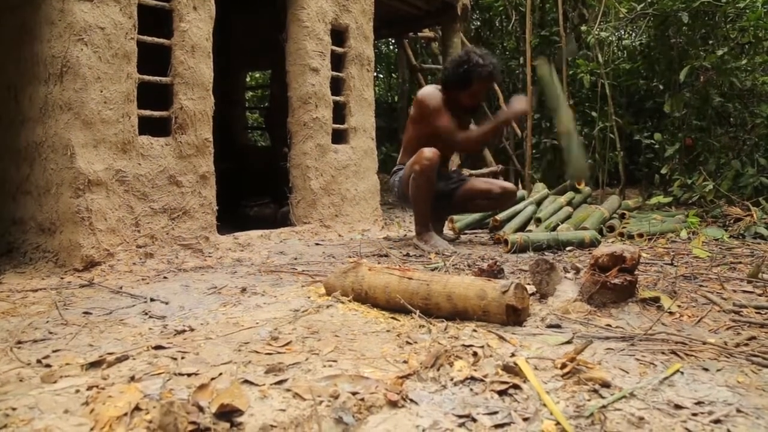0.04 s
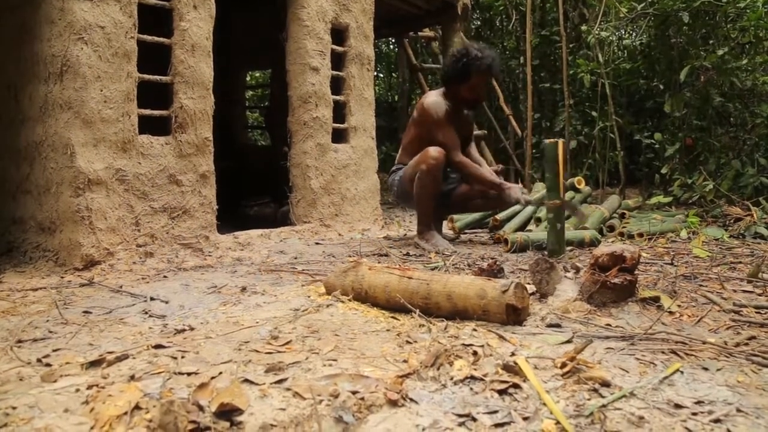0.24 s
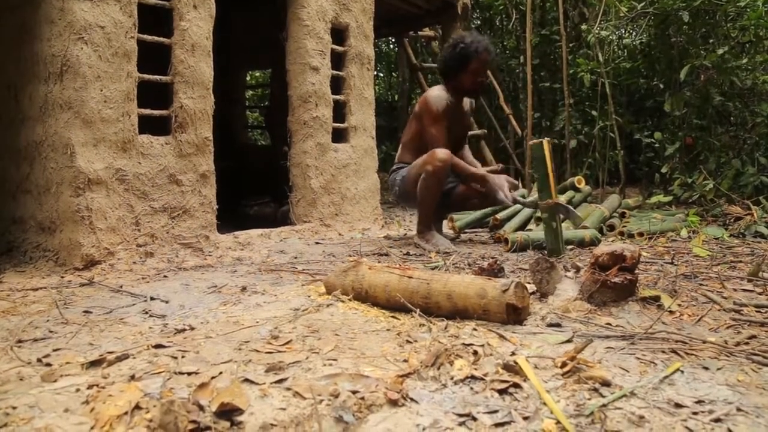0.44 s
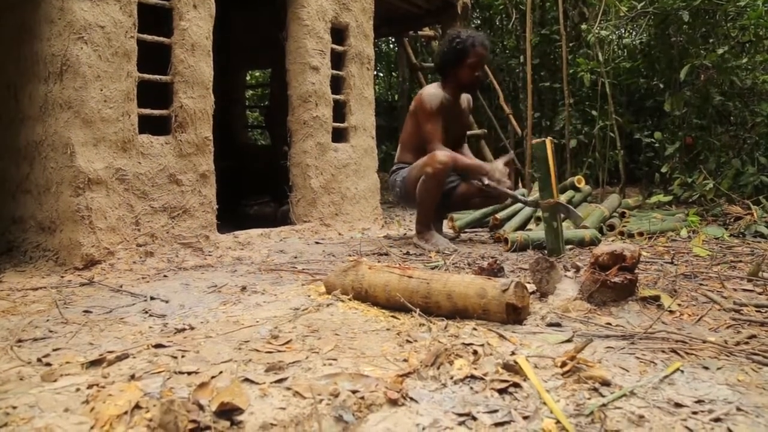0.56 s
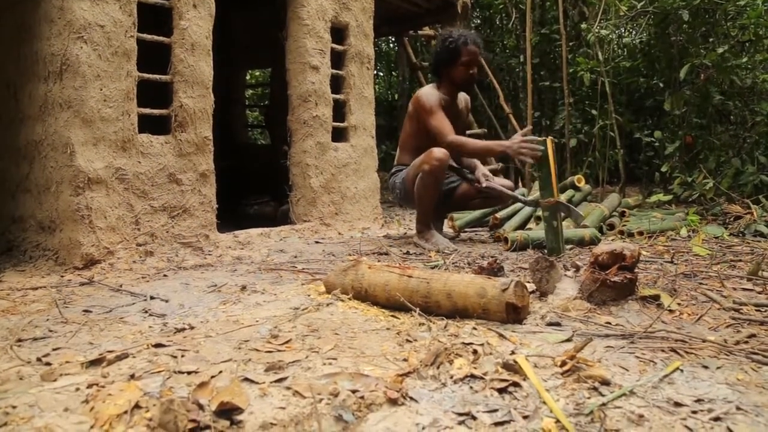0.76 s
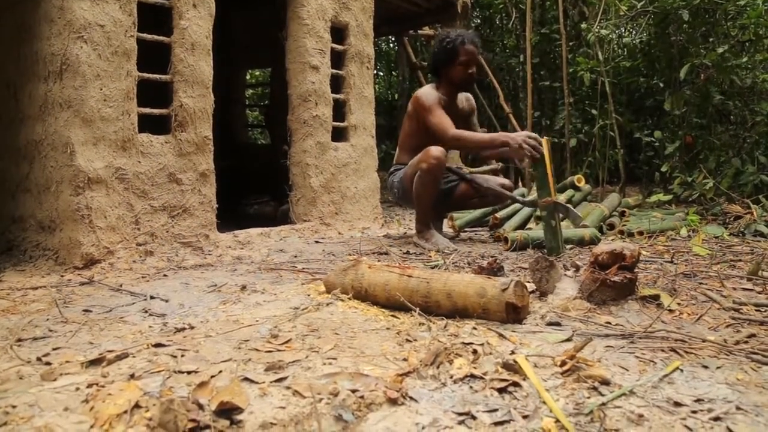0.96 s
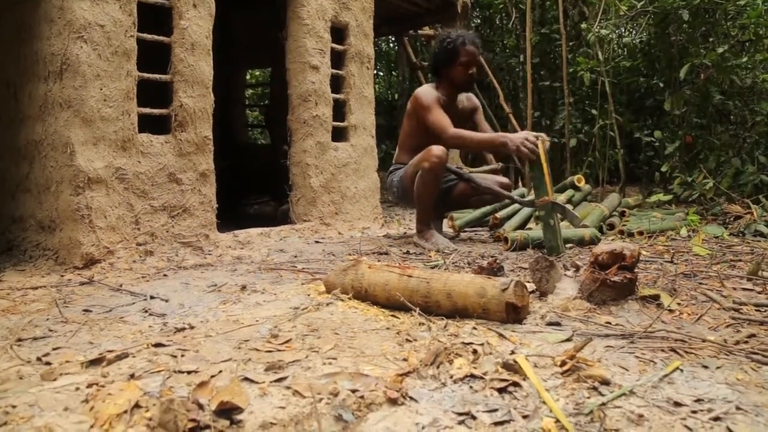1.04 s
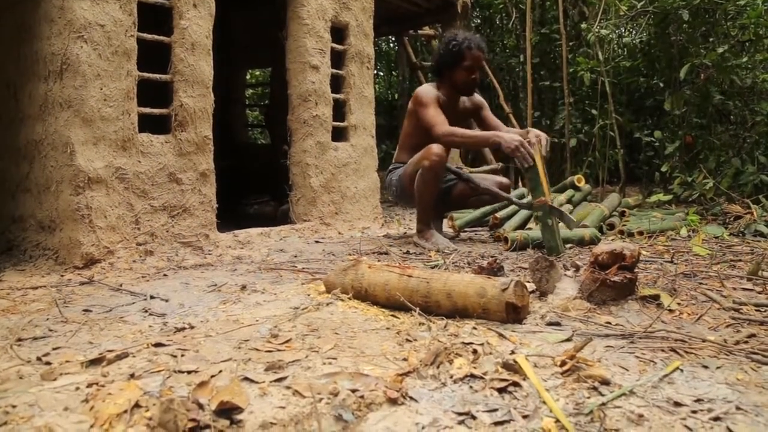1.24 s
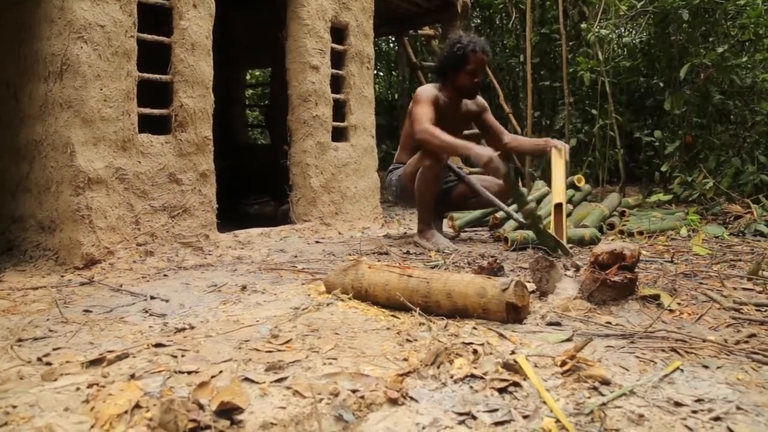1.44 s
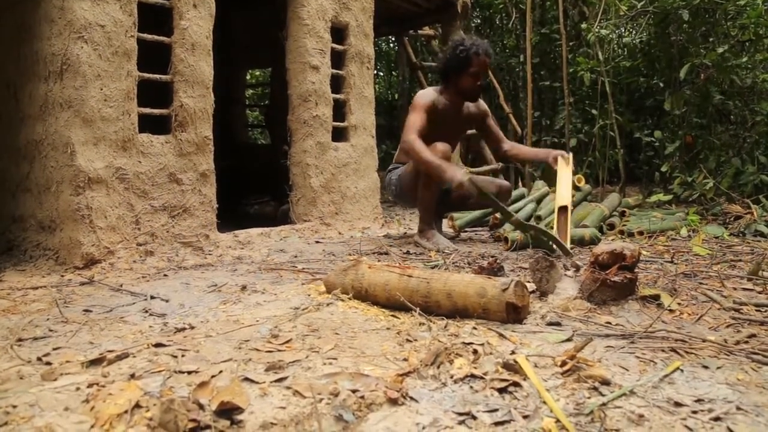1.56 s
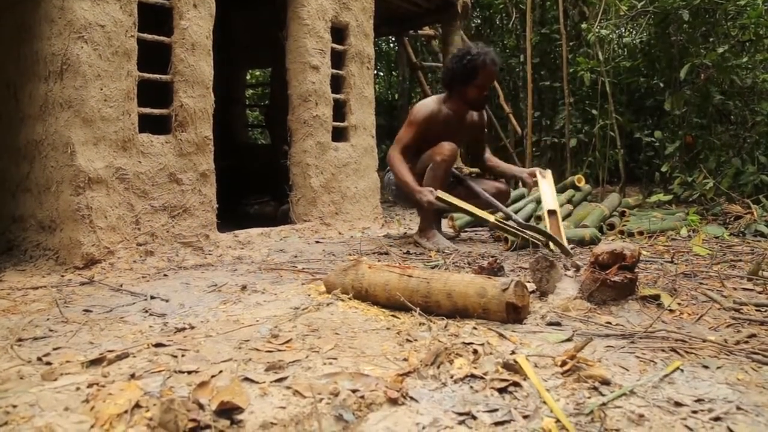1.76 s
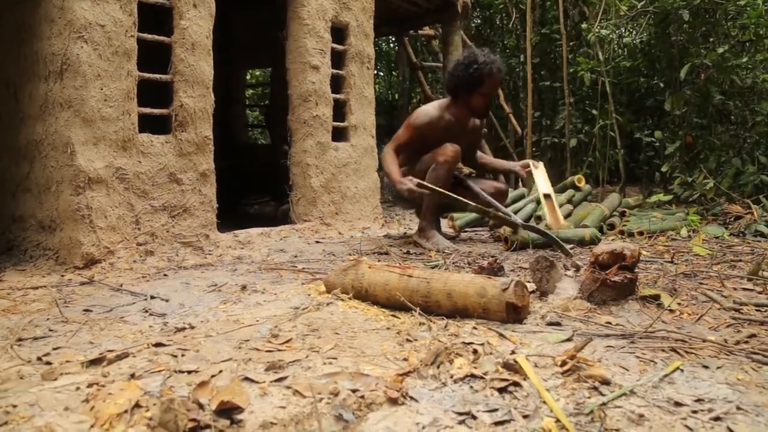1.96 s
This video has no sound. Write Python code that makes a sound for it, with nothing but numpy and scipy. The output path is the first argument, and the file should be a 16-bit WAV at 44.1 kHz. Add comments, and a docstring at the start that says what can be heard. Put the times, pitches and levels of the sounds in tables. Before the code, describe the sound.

Bamboo splits close by with a thud and a loud crack, then a loose knock. After a pause the halves creak, snap and tear apart, and one scrapes over dry leaves. Faint insects fill the forest behind.

```python
"""A forest edge, one microphone close to an upright bamboo cane, quiet insects and a low breeze behind.
A club drives a blade into the cane: a thud, a quick run of cracks that ring the tube, a loose knock.
The trees throw the cracks back, and faint dry ticks fill the pause. A second later the halves are
pulled apart with a creak, a snap and tearing fibres. Last, one half is dragged over dry litter
while a distant insect trills."""
import sys
import numpy as np
from scipy import signal
from scipy.fft import rfft, irfft
from scipy.io import wavfile

SR = 44100
rng = np.random.default_rng(int(sys.argv[2]) if len(sys.argv) > 2 else 0)


def inscribe(sig):
    """Save sig as 16-bit PCM at rate SR to the path in sys.argv[1].

    A 1-D sig is mono; a 2-D sig holds one channel per row.
    Samples are clipped to [-1, 1] before scaling.
    """
    pcm = np.round(np.clip(np.atleast_2d(sig).T, -1, 1) * 32767)
    wavfile.write(sys.argv[1], SR, pcm.astype(np.int16))


N = 88200
T = np.arange(N) / SR

# colour of the breaking cane wall (frequency [Hz], relative level [dB])
WALL_COLOUR = [(50, -58), (150, -20.5), (350, 3.5), (800, -0.5), (1500, 4.5), (2200, 1.5), (3200, 1),
               (4000, -1.5), (5800, -7.5), (7500, -9.5), (10500, -13.5), (13000, -17.5), (16000, -27)]
# colour of tearing fibres (frequency [Hz], relative level [dB])
FIBRE_COLOUR = [(30, -51.5), (200, -21), (400, -8), (650, -21), (1000, -3.5), (1500, -10.5), (2300, -6.5),
                (3500, -1), (5500, -6.5), (7400, -7), (9300, -10), (10500, -10), (13500, -13), (16000, -21)]
# modes of a split half (frequency [Hz], relative level [dB], t60 [s])
HALF_MODES = [(430, -11, .04), (996, 0, .05), (2195, -5, .05), (2640, -5, .04), (3150, -3, .04),
              (3500, 2, .03), (3870, -2, .025), (4362, 0, .04), (7180, -5, .02), (7500, -1, .025),
              (8735, -8, .03)]


def amp(db):
    """Decibels to gain."""
    return 10 ** (np.asarray(db) / 20)


def unit(x):
    """Scales to energy 1."""
    return x / np.sqrt(np.sum(x ** 2) + 1e-20)


def read(points, hz):
    """Reads a curve on a log-frequency axis."""
    f, value = np.transpose(points)
    return np.interp(np.log(hz + 1), np.log(f), value)


def level(points):
    """Gain over time from (time [s], level [dB]) points."""
    return amp(np.interp(T, *np.transpose(points)))


def add(mix, s, sound):
    """Adds a sound at its time."""
    part = mix[max(round(s * SR), 0):][:len(sound)]
    part += sound[:len(part)]


def through(x, response):
    """Passes a sound through an impulse response."""
    return signal.fftconvolve(x, response)[:N]


def colour(points, size=4096):
    """Minimum-phase impulse response with the given spectral shape, energy 1."""
    hz = abs(np.fft.fftfreq(size, 1 / SR))
    log_gain = np.log(amp(read(points, hz)))
    spectrum = np.exp(np.conj(signal.hilbert(log_gain)))
    return unit(np.fft.ifft(spectrum).real[:size // 2])


def ring(modes):
    """Impulse response of dying modes, energy 1; little is radiated below the lowest."""
    t = T[:SR // 4]
    swing = sum(amp(db - 60 * t / t60) * np.sin(2 * np.pi * hz * t) for hz, db, t60 in modes)
    low_cut = signal.butter(2, .5 * modes[0][0], "high", fs=SR, output="sos")
    return unit(signal.sosfilt(low_cut, swing))


def steady(response):
    """Steady noise with the colour of a response."""
    return irfft(rfft(rng.standard_normal(N)) * rfft(response, N), N)


def crackle(per_s, spread_db):
    """Stream of tiny clicks of uneven size, rms 1."""
    size = amp(spread_db * np.minimum(rng.exponential(1, N), 4))
    sign = rng.choice([-1, 1], N)
    occurs = rng.random(N) < per_s / SR
    return unit(size * sign * occurs) * np.sqrt(N)


def spray(decay_s):
    """A short dying burst of fibre breaks, energy 1."""
    t = T[:SR // 16]
    breaks = crackle(per_s=22000, spread_db=1.5)[:len(t)]
    return unit(breaks * np.exp(-t / max(decay_s, .0016)))


def background():
    """Far from the microphone: forest air, an insect chorus, a low breeze and two thin tones."""
    # colours of the air and of the breeze's rumble (frequency [Hz], relative level [dB])
    air_colour = [(100, -2), (250, -2.5), (500, 1.5), (900, -4.5), (2000, -2), (4400, -2), (5100, -2),
                  (5600, -17.5), (6700, -15), (8000, -18), (16000, -15)]
    breeze_colour = [(20, -31), (38, -9.5), (60, 0), (115, 3.5), (170, -3.5), (260, -11.5), (600, -28.5),
                     (2000, -42)]
    # their level, which dips after the blow and slowly recovers (time [s], level [dB])
    air_levels = [(0, -55.5), (.22, -52), (.4, -61.5), (.7, -56), (1.1, -52), (2, -53)]
    breeze_levels = [(0, -55), (.2, -55), (.45, -60.5), (.9, -56), (1.3, -54), (1.65, -53.5), (2, -54.5)]
    # bands of the insect chorus (frequency [Hz], relative level [dB], t60 [s])
    chorus_bands = [(1144, 1.5, 0.21), (2300, -4, 0.075), (2797, 6, 0.18), (3130, -10.5, 0.12),
                    (3697, 3, 0.075), (4200, 11, 0.0067)]
    # a distant insect's short trill and a steady whine
    # (centre time [s], length [s], frequency [Hz], width [Hz], level [dB])
    thin_tones = [(1.705, .13, 4740, 45, -53.5), (1.1, 4, 15673, 5, -67)]
    air = steady(colour(air_colour))
    chorus = amp(-12.5) * steady(ring(chorus_bands))
    breeze = steady(colour(breeze_colour))
    out = level(air_levels) * (air + chorus) + level(breeze_levels) * breeze
    for s, length, hz, width, db in thin_tones:
        drift = np.cumsum(rng.standard_normal(N)) * np.sqrt(2 * np.pi * width / SR)
        swell = np.exp(-(2 * (T - s) / length) ** 2)
        out += amp(db) * swell * np.sin(2 * np.pi * hz * T + drift)
    return out


def forest_echo(x):
    """Quick scatter from the ground and a hut nearby, then a longer wash from the trees."""
    # colour of the echo (frequency [Hz], relative level [dB])
    echo_colour = [(60, -24), (250, -15), (500, -6.5), (900, -3.5), (1500, -11.5), (2500, 0.5), (3000, 3.5),
                   (3700, 1), (4500, -4.5), (8000, -3.5), (16000, 4.5)]
    # decay among the trees (frequency [Hz], t60 [s])
    tree_decay = [(100, 0.18), (600, 0.4), (1500, 0.78), (3200, 0.61), (7000, 0.84), (16000, 0.49)]
    t = T[:SR]
    hz, frame_s, noise = signal.stft(rng.standard_normal(SR), SR, nperseg=256)
    fade = amp(-60 * frame_s / read(tree_decay, hz)[:, None])
    trees = signal.istft(noise * fade, SR, nperseg=256)[1][:SR]
    near = rng.standard_normal(SR) * np.exp(-t / .051)
    rise = 1 - np.exp(-(t / .0093) ** 2)
    response = amp(-14.5) * unit(trees * rise) + amp(-17) * unit(near * rise)
    return through(through(x, response), colour(echo_colour))


def leaves():
    """Dry leaves shift on the ground in short crisp rustles."""
    # rustles (time [s], energy [dB], decay [s])
    rustles = [(0.5234, -29.5, 0.0068), (1.062, -40, 0.0095), (1.792, -18, 0.039)]
    # colour of dry leaves (frequency [Hz], relative level [dB])
    leaf_colour = [(300, -24), (1500, 4.5), (4500, 4.5), (7300, -1), (10500, 1.5), (16000, -22)]
    out = np.zeros(N)
    for s, db, decay_s in rustles:
        add(out, s, amp(db) * spray(decay_s))
    return through(out, colour(leaf_colour))


def ticks():
    """Faint dry ticks in the pause, each with a brief ring."""
    # dry ticks (time [s], relative energy [dB])
    events = [(.523, -22.5), (0.551, -24), (.641, -26.5), (.686, -24.5), (0.808, -22.5), (0.851, -23.5),
              (0.893, -26.5), (0.972, -20.5), (1.065, -23.5), (1.141, -26.5), (1.236, -22)]
    # their colour (frequency [Hz], relative level [dB])
    tick_colour = [(200, -25), (1000, -10), (3300, -5), (4200, 2), (5300, -11), (6600, -8), (8000, -20),
                   (16000, -30)]
    # their modes (frequency [Hz], relative level [dB], t60 [s])
    tick_modes = [(2800, -12, .02), (3830, 0, .03), (4270, 0, .03), (6600, -11, .02)]
    bursts = np.zeros(N)
    for s, db in events:
        add(bursts, s, amp(db) * spray(decay_s=.0073))
    return amp(-5) * through(bursts, colour(tick_colour)) + amp(-9) * through(bursts, ring(tick_modes))


def dragging():
    """Grit and dry leaves catch on the sliding half and ring it."""
    # scraping over the litter (time [s], level [dB])
    drag = [(1.64, -79), (1.69, -50), (1.73, -78), (1.775, -58), (1.80, -56), (1.84, -77), (1.89, -63),
            (1.908, -42), (1.925, -42), (1.948, -44.5), (1.972, -35.5), (1.99, -30.5), (2.0, -32)]
    # colour of the scraping (frequency [Hz], relative level [dB])
    litter_colour = [(100, -20), (350, -15.5), (650, 0.5), (950, -10.5), (1400, 3), (3300, 5), (4500, -0.5),
                     (6000, -8.5), (10000, -10), (16000, -23)]
    # modes of the dragged half (frequency [Hz], relative level [dB], t60 [s])
    modes = [(605, -35, 0.064), (1480, 3.5, 0.09), (1790, -22, 0.085), (2035, 8.5, 0.15), (2525, 7, 0.044),
             (2860, -2, 0.063), (3180, -13, .06), (3450, -15, .08)]
    catches = crackle(per_s=4000, spread_db=2) * level(drag) * (T > drag[0][0])
    return through(catches, colour(litter_colour)) + amp(-6.5) * through(catches, ring(modes))


def creaking():
    """The strained cane creaks as it gives: small slips ring its modes."""
    # course of the creak (time [s], level [dB])
    strain = [(1.2, -58), (1.238, -55.5), (1.29, -57), (1.315, -44), (1.335, -52), (1.346, -44.5),
              (1.39, -48), (1.44, -37), (1.49, -54), (1.56, -65)]
    # modes of the strained cane (frequency [Hz], relative level [dB], t60 [s])
    modes = [(1300, -2.5, 0.099), (2136, 2, 0.1), (2730, 1, 0.11), (2970, 3, 0.062), (3300, 7, 0.025),
             (3910, 4, 0.04), (4140, -1, .06)]
    strained = (T > strain[0][0]) & (T < strain[-1][0])
    slips = crackle(per_s=700, spread_db=1.5) * level(strain) * strained
    return through(slips, ring(modes))


def tearing():
    """Fibres between the halves break under the pull and ring them."""
    # tearing as the halves are pulled (time [s], level [dB])
    pull = [(1.19, -59.5), (1.235, -56), (1.28, -61), (1.312, -58), (1.338, -58), (1.343, -40),
            (1.398, -45.5), (1.412, -35.5), (1.444, -31.5), (1.452, -40.5), (1.484, -37), (1.51, -42.5),
            (1.57, -59), (1.62, -62)]
    breaks = crackle(per_s=5000, spread_db=2.5) * level(pull) * (T > pull[0][0])
    return through(breaks, colour(FIBRE_COLOUR)) + amp(-14) * through(breaks, ring(HALF_MODES))


def knocks():
    """Loose wood meets wood or earth: a hollow note with a dry tick."""
    # knocks (time [s], energy [dB], pitch [Hz], t60 [s], tick against note [dB])
    hits = [(0.3467, -3, 732, 0.057, -6.5), (.424, -21, 932, 0.056, -1), (.520, -26, 762, 0.19, -18),
            (1.237, -22.5, 1175, 0.11, -4), (1.316, -24.5, 238, .05, 2), (1.454, -10.5, 657, 0.05, -8),
            (1.458, -11.5, 373, 0.11, 0.5), (1.476, -17.5, 551, 0.11, 8.5)]
    # modes of a knock (frequency [multiple of pitch], relative level [dB])
    partials = [(.5, -31), (.93, -29), (1, 18.5), (1.12, 11), (1.6, 10.5), (1.9, -22), (2.75, -21)]
    out, wall = np.zeros(N), colour(WALL_COLOUR)
    for s, db, hz, t60, tick_db in hits:
        add(out, s, amp(db) * ring([(hz * ratio, mode_db, t60) for ratio, mode_db in partials]))
        add(out, s, amp(db + tick_db) * through(spray(decay_s=.012), wall))
    return out


def thuds():
    """Each dull thud is a few heavy swings that swell and stop."""
    # the club lands, the cane is driven against the ground, a half is set down
    # (time [s], length [s], pitch [Hz], level [dB])
    blows = [(.2245, 0.0052, 259, -2.5), (.2262, 0.023, 125.6, -9), (1.485, 0.069, 147, -45.5)]
    out = np.zeros(N)
    for s, length, hz, db in blows:
        t = np.arange(0, length, 1 / SR)
        add(out, s, amp(db) * np.sin(np.pi * t / length) * np.sin(2 * np.pi * hz * t))
    return out


def splitting(cracks, spectrum, modes, detune=.0066):
    """Each crack is a spray of breaking fibres, and its jolt rings the cane."""
    direct, rung = np.zeros(N), np.zeros(N)
    for s, db, decay_s, ring_db in cracks:
        add(direct, s, amp(db) * spray(decay_s))
        # the modes shift a little as each crack opens the wall further
        shifts = 1 + detune * rng.standard_normal(len(modes))
        shifted = [(hz * shift, mode_db, t60) for (hz, mode_db, t60), shift in zip(modes, shifts)]
        add(rung, s, amp(db + ring_db) * ring(shifted))
    return through(direct, colour(spectrum)) + rung


def halves_snapping():
    """Fibres snap as the halves part, and the halves ring."""
    # snaps (time [s], energy [dB], spray decay [s], ring against spray [dB])
    snaps = [(1.402, -0.5, 0.0083, -5.5), (1.4062, -1, 0.0023, -1), (1.4087, -5.5, 0.0031, -5.5),
             (1.444, -13, 0.0023, -16), (1.486, -28, 0.0024, -20), (1.5155, -19, 0.0014, -25)]
    return splitting(snaps, FIBRE_COLOUR, HALF_MODES)


def cane_cracking():
    """Close to the microphone, the blade sends cracks down the whole cane and the tube rings."""
    # cracks (time [s], energy [dB], spray decay [s], ring against spray [dB])
    cracks = [(.2229, -1, 0.0041, -14), (.2251, 8, 0.014, -17), (.2325, 0, 0.012, 3),
              (.2381, 2.5, 0.0058, -17), (.2451, 8.5, 0.0034, -1), (.2489, 12, 0.0022, -8),
              (.2532, 5.5, .0025, -11), (.2601, 14, 0.002, 1), (.2642, 9, 0.0043, 0)]
    # modes of the tube (frequency [Hz], relative level [dB], t60 [s])
    tube_modes = [(380, -4, .04), (501, -3, .05), (709, -3, .05), (910, -1, .045), (975, -3, .03),
                  (1181, -4, .04), (1295, -3, .035), (1381, -1, .04), (1580, 0, .04), (1900, 0, .02),
                  (2310, -2, .05), (2980, 4, .012), (3280, 4, .012), (6780, -15, .04)]
    return splitting(cracks, WALL_COLOUR, tube_modes)


def scene():
    """The work on the cane up close, its echo and the forest behind it, in mono."""
    work = thuds() + cane_cracking() + knocks()
    work = work + halves_snapping() + tearing() + creaking() + dragging() + ticks() + leaves()
    return (work + forest_echo(work) + background())[None]


def record(dry):
    """Behind the microphone, the loudest peaks are rounded off and the highest treble is cut."""
    ceiling, edge_hz = .95, 15760
    rounded = dry / (1 + (dry / ceiling) ** 4) ** (1 / 4)
    low_pass = signal.firwin(1023, edge_hz, window=("kaiser", 9), fs=SR)
    return signal.oaconvolve(rounded, low_pass[None], "same")


dry = scene()
out = record(dry)
inscribe(out)
```